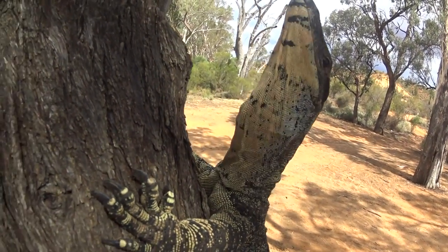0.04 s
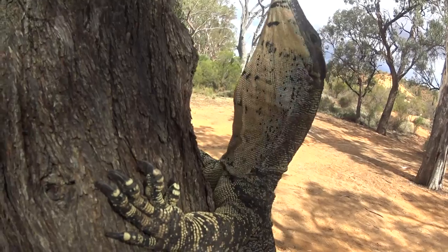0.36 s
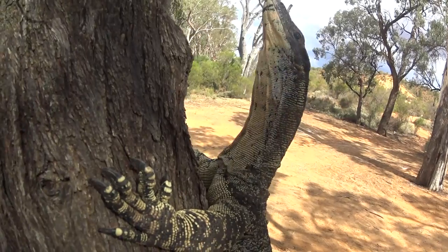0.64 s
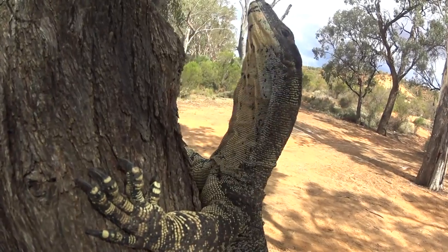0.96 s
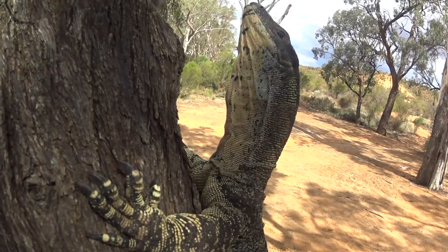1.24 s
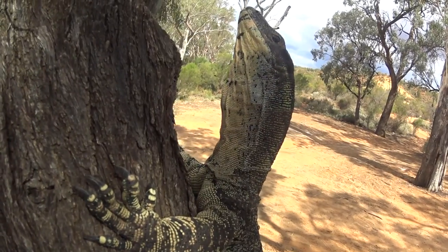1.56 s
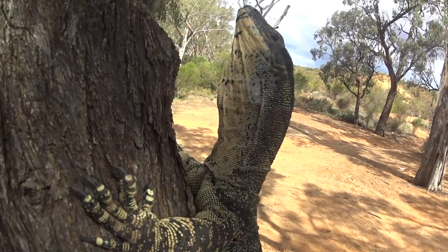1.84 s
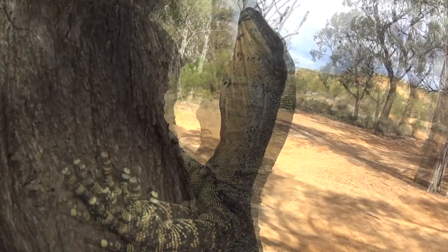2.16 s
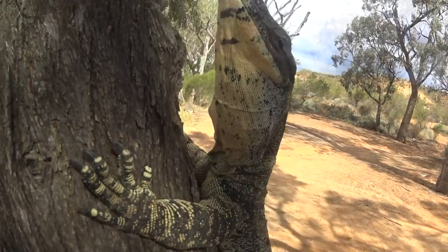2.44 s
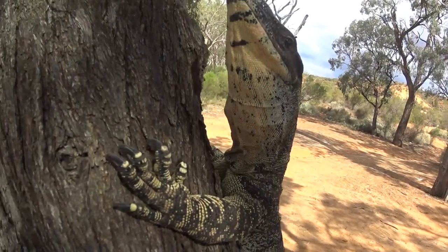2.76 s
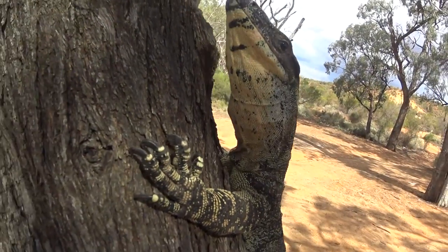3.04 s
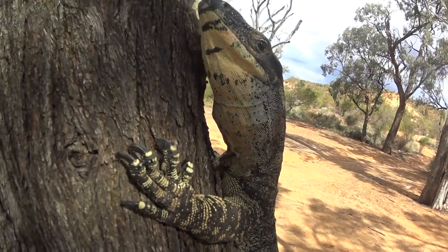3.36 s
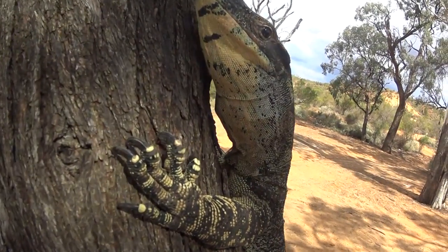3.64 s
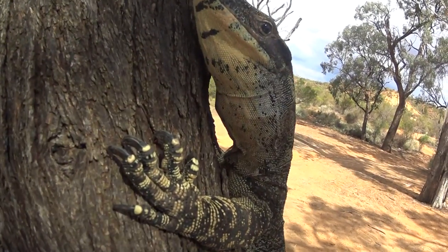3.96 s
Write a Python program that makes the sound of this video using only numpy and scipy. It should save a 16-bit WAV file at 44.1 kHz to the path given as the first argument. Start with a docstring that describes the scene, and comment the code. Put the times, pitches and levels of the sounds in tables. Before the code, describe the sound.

A large lizard hisses close to the microphone in quiet bushland. In the first second its claws tick on bark, it snorts briefly at about 0.5 seconds, then smacks wetly. Small birds chirp faintly around 1 and 1.8 seconds. After a wet click near 2.2 seconds, the hiss starts and swells until 4 seconds, with a hollow, fluttering throat tone. A soft low thump falls at about 3.4 seconds.

```python
"""A large monitor lizard clings to a tree in quiet bushland, close to the microphone.
Its claws tick on the bark, it puffs once through the nose, and it smacks and clicks wetly,
while small birds chirp among the trees. From just after 2 s it forces out a long, swelling hiss:
air rushes through the throat and jets from the nostrils, pulsed by a hollow, fluttering throat tone.
A soft low thump falls during the hiss."""
import sys
import numpy as np
from scipy import signal
from scipy.fft import rfft, irfft
from scipy.io import wavfile
from scipy.ndimage import uniform_filter1d, map_coordinates

SR = 44100
rng = np.random.default_rng(int(sys.argv[2]) if len(sys.argv) > 2 else 0)


def unload_wav(signal):
    """Save mono or channel-first audio to the path in sys.argv[1] as 16-bit WAV at rate SR, clipped to [-1, 1]."""
    wavfile.write(
        sys.argv[1],
        SR,
        np.round(np.clip(np.atleast_2d(signal).T, -1, 1) * 32767).astype(np.int16),
    )


N = 176400
T = np.arange(N) / SR
HZ = np.maximum(np.arange(N // 2 + 1) * SR / N, 1)
CUTOFF_HZ = 10980


def from_db(db):
    """Decibels to gain."""
    return 10 ** (np.asarray(db) / 20)


def unit_rms(x):
    """Scale to unit rms."""
    return x / np.sqrt(np.mean(np.abs(x) ** 2) + 1e-20)


def over_time(rows, column=1):
    """One table column at every sample."""
    rows = np.array(rows)
    return np.interp(T, rows[:, 0], rows[:, column])


def over_hz(rows):
    """A spectrum table at every frequency."""
    hz, value = np.transpose(rows)
    return np.interp(np.log(HZ), np.log(hz), value)


def pan(left_minus_right_db):
    """Left and right gains."""
    return from_db(np.array([[.5], [-.5]]) * left_minus_right_db)


def drift(rate_hz):
    """Low-passed random motion, unit rms."""
    return unit_rms(irfft(rfft(rng.standard_normal(N)) / (1 + (HZ / rate_hz) ** 2), N))


def noise(gain, correlation, balance_db=0):
    """Coloured stereo noise, unit rms."""
    mid, side = rfft(rng.standard_normal((2, N)))
    alike = np.clip(over_hz(correlation), -1, 1)
    stereo = np.sqrt(1 + alike) * mid + np.sqrt(1 - alike) * side * [[1], [-1]]
    return unit_rms(irfft(stereo * gain * pan(balance_db), N))


def peak(hz, width_hz):
    """Gain of one resonance at every frequency."""
    return 1 / np.hypot(1, (HZ ** 2 - hz ** 2) / (HZ * width_hz))


def resonate(x, hz, width_hz):
    """Two-pole resonator, unit peak gain."""
    r = np.exp(-np.pi * width_hz / SR)
    feedback = [1, -2 * r * np.cos(2 * np.pi * hz / SR), r * r]
    return signal.lfilter(np.array([1, 0, -1]) * (1 - r * r) / 2, feedback, x + 1e-18)


def strike(start_s, decay_s):
    """Envelope: quick rise, exponential fall."""
    age = np.maximum(T - start_s, 0) / decay_s
    return 1.38 * np.minimum(age * 2, 1) * np.exp(-age)


def swell(peak_s, rise_s, fall_s):
    """Envelope: Gaussian rise, exponential fall."""
    return np.exp(-(np.minimum(T - peak_s, 0) / rise_s) ** 2 - np.maximum(T - peak_s, 0) / fall_s)


def bursts(rows, width_octaves):
    """Short bursts of band-passed noise."""
    out, edge_ratio = 0, 2 ** (width_octaves / 2)
    for start_s, level_db, decay_s, centre_hz in rows:
        edges_hz = [centre_hz / edge_ratio, min(centre_hz * edge_ratio, CUTOFF_HZ)]
        bandpass = signal.butter(2, edges_hz, "band", fs=SR, output="sos")
        band = unit_rms(signal.sosfilt(bandpass, rng.standard_normal(N)))
        out = out + from_db(level_db) * strike(start_s, decay_s) * band
    return out


def flutter(width_hz):
    """Wandering complex amplitude of a resonance blown by turbulent air."""
    return unit_rms(drift(width_hz) + 1j * drift(width_hz))


def oscillate(amplitude, pitch_hz):
    """Tone with moving pitch and complex amplitude."""
    return np.sqrt(2) * np.real(amplitude * np.exp(2j * np.pi * np.cumsum(pitch_hz) / SR))


# open air: freq_hz, gain_db
AIR_SPECTRUM = [(60, -42), (110, -8.5), (400, -5), (3400, -14), (11000, -20.5)]
# open air: time_s, level_db
AIR_LEVEL = [(0, -55), (.85, -56), (2.1, -58)]
# background, left to right: freq_hz, correlation
AIR_CORRELATION = [(60, 0.7), (300, 0), (1200, -0.45), (8000, 0.4)]
# microphone rumble: freq_hz, gain_db
RUMBLE_SPECTRUM = [(18, -11), (35, -4.5), (55, -2.5), (78, -12), (105, -5.5), (160, -26), (300, -53)]
# microphone rumble: time_s, level_db
RUMBLE_LEVEL = [(0, -60.5), (1.9, -65), (3.3, -48), (4, -53)]
def outdoors():
    """Faint open air, and low rumble on the hand-held microphone."""
    air = noise(from_db(over_hz(AIR_SPECTRUM)), AIR_CORRELATION)
    rumble = noise(from_db(over_hz(RUMBLE_SPECTRUM)), AIR_CORRELATION, balance_db=-4.5)
    return air * from_db(over_time(AIR_LEVEL)) + rumble * from_db(over_time(RUMBLE_LEVEL))


# far calls: peak_s, level_db, rise_s, fall_s, centre_hz, width_hz
FAR_CALLS = [(0.98, -53, 0.077, 0.15, 5330, 1400), (1.088, -50, 0.046, 0.068, 4600, 3400),
             (1.082, -50, .01, .075, 4680, 350)]
def far_birds():
    """Harsh notes, blurred by the trees into bands of noise."""
    return sum(from_db(level_db) * swell(peak_s, rise_s, fall_s)
               * noise(peak(centre_hz, width_hz) ** 2, AIR_CORRELATION)
               for peak_s, level_db, rise_s, fall_s, centre_hz, width_hz in FAR_CALLS)


def bird_note(start_s, length_s, level_db, contour, jitter=.01225):
    """One whistle; contour maps progress (0-1) to pitch in Hz."""
    progress = np.clip((T - start_s) / length_s, 0, 1)
    pitch_hz = contour(progress) * (1 + jitter * drift(460))
    envelope = np.sqrt(2 * np.abs(np.sin(np.pi * progress)))
    return from_db(level_db) * envelope * np.sin(2 * np.pi * np.cumsum(pitch_hz) / SR)


def hook(progress, held_hz=4300, drop_hz=1750, held_at=.66):
    """Pitch drops fast, holds, then dips at the end."""
    return held_hz + drop_hz * (1 - progress / held_at) ** 3


def slurs(progress, count=3, low_hz=2480, drop_hz=450):
    """Pitch jumps up and slides back, repeatedly."""
    return low_hz + drop_hz * (1 - progress * count % 1) ** 2


# gliding notes: start_s, length_s, level_db, start_hz, middle_hz, end_hz
CHIRPS = [(.298, .02, -59, 5700, 4850, 3700), (1.069, 0.025, -45.5, 6650, 6300, 5150),
          (1.065, 0.03, -48.5, 5400, 4660, 3200), (1.302, 0.03, -61, 6400, 6300, 6280),
          (1.752, 0.029, -56, 6380, 5780, 3800), (1.774, 0.0162, -49.5, 8400, 7230, 6800),
          (1.838, .013, -54.5, 6800, 5960, 5240), (2.185, 0.071, -53, 3750, 4340, 4450)]
# hooked notes: start_s, length_s, level_db
HOOKS = [(.094, 0.043, -56), (1.021, 0.041, -46.5), (1.804, 0.031, -48)]
def birds(rasp=.17, echo_db=-1.5, t60_s=.47):
    """Whistled glides, hooks and one faint warble, scattered by the trees."""
    song = 0
    for start_s, length_s, level_db, *pitches_hz in CHIRPS:
        glide = np.poly1d(np.polyfit([0, .5, 1], pitches_hz, 2))
        song = song + bird_note(start_s, length_s, level_db, glide)
    song += sum(bird_note(*row, hook) for row in HOOKS)
    song += bird_note(start_s=1.83, length_s=.115, level_db=-65, contour=slurs)
    song *= 1 + rasp * drift(530)
    trees = rng.standard_normal((2, N)) * from_db(-60 * T / t60_s)
    echo = signal.fftconvolve(song[None], unit_rms(trees) / np.sqrt(N), axes=1)[:, :N]
    return song + from_db(echo_db) * echo


def bark_rustle(crumbs_per_s=250, level_db=-60, end_s=1):
    """Bark rustles as the lizard shifts its grip."""
    crumbs = (rng.random(N) < crumbs_per_s / SR) * rng.standard_normal(N)
    grip = np.sin(np.pi * np.minimum(T / end_s, 1) ** .4)
    return from_db(level_db) * grip * unit_rms(resonate(crumbs, hz=5000, width_hz=20000))


# high noise bursts: start_s, level_db, decay_s, centre_hz
TICKS_AND_CHIRP = [(.127, -45, 0.0021, 7500), (.1665, -34, 0.0017, 3830), (.174, -49, 0.018, 3200),
                   (.2565, -46.5, 0.00093, 8000), (.295, -57, 0.066, 6040), (.363, -50, 0.0021, 3400),
                   (.471, -49, 0.0024, 2770), (.7435, -41, 0.0036, 6760), (.784, -45, 0.00081, 7300),
                   (.797, -38.5, 0.00052, 6670), (1.215, -43.5, 0.00089, 9500),
                   (2.308, -44.5, 0.0041, 7700)]
def ticks_and_chirp():
    """Short ticks of claws on bark; the long burst at 0.295 s is a distant bird's faint, blurred chirp."""
    return bursts(TICKS_AND_CHIRP, width_octaves=1.05)


# mouth smacks: start_s, level_db, decay_s, centre_hz
SMACKS = [(.7425, -40.5, 0.0046, 1670), (.784, -37.5, 0.00061, 1160), (.7972, -46.5, 0.0031, 790),
          (2.2565, -37, 0.0055, 704), (2.2575, -43, 0.0036, 1330), (2.308, -42.5, 0.0052, 2600)]
# falling low tones: start_s, level_db, start_hz, end_hz, decay_s
CLICKS_AND_THUMP = [(.783, -47.5, 640, 262, 0.009), (2.014, -46, 516, 115, 0.014),
                    (2.2563, -32.5, 500, 85, 0.013), (3.389, -42, 198, 112, 0.022)]
def smacks_clicks_and_thump(glide_s=.0123, roughness=.6, pan_db=-1.5):
    """Wet smacks, three rough falling clicks, and a soft low thump at 3.389 s during the hiss."""
    out = bursts(SMACKS, width_octaves=.74)
    for start_s, level_db, start_hz, end_hz, decay_s in CLICKS_AND_THUMP:
        pitch_hz = end_hz + (start_hz - end_hz) * np.exp(-np.maximum(T - start_s, 0) / glide_s)
        tone = np.sin(2 * np.pi * np.cumsum(pitch_hz * (T > start_s)) / SR)
        out += from_db(level_db) * strike(start_s, decay_s) * (1 + roughness * drift(450)) * tone
    return out * pan(pan_db)


# breath, left to right: freq_hz, correlation
BREATH_CORRELATION = [(300, 0.9), (700, 0.85), (2500, 0.71), (7000, 0.94)]
# breath balance: freq_hz, left_minus_right_db
BREATH_BALANCE = [(340, -2), (1900, -2), (3400, 0), (11000, 1)]
def breath(gain):
    """Turbulent air from the lizard's head."""
    return noise(gain, BREATH_CORRELATION, over_hz(BREATH_BALANCE))


# nose puff: freq_hz, gain_db
PUFF_SPECTRUM = [(120, -19), (260, -11), (390, 1), (500, -4.5), (850, -14), (1150, -21), (3600, -24),
                 (5600, -17), (6200, -7), (6800, -22), (8600, -21), (9400, -15), (11000, -33)]
# puff and draw of air: time_s, level_db
PUFF_LEVEL = [(.495, -79), (.52, -54), (.541, -40), (.558, -38.5), (.574, -41.5), (.59, -83), (1.03, -60.5),
              (1.35, -87)]
def puff(roughness_db=1.8):
    """A short, rough snort, then a faint draw of air."""
    air = breath(from_db(over_hz(PUFF_SPECTRUM)))
    return air * from_db(over_time(PUFF_LEVEL) + roughness_db * drift(200))


# nostril whistles: peak_s, level_db, rise_s, fall_s, centre_hz, width_hz
EDGE_TONES = [(2.82, -43.5, .1, .5, 7790, 100), (3.19, -37.5, 0.33, 0.12, 6700, 270),
              (3.8, -38, .14, .6, 7250, 189)]
def edge_tones():
    """Breathy whistles catch at the nostrils, one after another."""
    return sum(from_db(level_db) * swell(peak_s, rise_s, fall_s) * breath(peak(centre_hz, width_hz))
               for peak_s, level_db, rise_s, fall_s, centre_hz, width_hz in EDGE_TONES)


# throat tone: time_s, relative_db, pitch_hz
THROAT_TONE = [(2.23, -45, 361), (2.43, -48, 350), (2.5, -38, 314.6), (2.7, -34, 327.3),
               (2.86, -33.5, 314.9), (2.99, -28.5, 320), (3.035, -37.5, 324.4), (3.1, -29, 310),
               (3.22, -26, 314.4), (3.34, -24, 323.4), (3.375, -35.5, 330.3), (3.425, -20.5, 350.8),
               (3.485, -27, 325.7), (3.53, -23, 330.2), (3.68, -24.5, 321), (3.718, -34.5, 342),
               (3.75, -24, 334.2), (3.82, -23.5, 352.8), (3.855, -30.5, 360.5), (3.895, -19.5, 341.5),
               (4, -21.5, 358)]
# throat ringing: time_s, steady_share
THROAT_STEADINESS = [(2.6, 0), (3.3, 0.53), (3.82, 0.46), (3.92, 0.9)]
def throat_tone(flutter_hz=29, skirt_hz=74, skirt_db=.5, gain_db=-.5, pan_db=-3.5):
    """The throat flutters, steadying under pressure. Returns the tone and its unit-rms cycle."""
    steady = over_time(THROAT_STEADINESS)
    unsteady = flutter(flutter_hz) + (1 - steady) * from_db(skirt_db) * flutter(skirt_hz)
    amplitude = np.sqrt(steady) + np.sqrt(1 - steady) * unsteady
    amplitude /= np.sqrt(uniform_filter1d(np.abs(amplitude) ** 2, size=1700))  # level over 39 ms
    cycle = oscillate(amplitude, over_time(THROAT_TONE, column=2))
    return cycle * from_db(over_time(THROAT_TONE) + gain_db) * pan(pan_db), cycle


EARLY_S, MIDDLE_S, LATE_S = 2.8, 3.24, 3.55  # the airway changes shape as effort grows
# throat rush: freq_hz, gain_db
RUSH_SPECTRUM = [(170, -38), (260, 3.5), (450, 1), (750, -2.5), (1100, -9), (1290, -15), (1365, -20.5),
                 (1500, -8), (1950, -12.5), (2600, -19), (4000, -17), (11000, -22)]
# throat rush: time_s, level_db
RUSH_LEVEL = [(2.25, -52), (2.58, -41.5), (3.0, -35), (3.35, -32.5), (3.55, -29.5), (3.72, -30.5),
              (3.9, -28), (4, -27.5)]
def throat_rush(cycle, pulse_depth=.15):
    """Pulsed air in the throat, with a narrow whistle that sinks and grows."""
    whistle_hz = np.interp(T, [EARLY_S, LATE_S], [1490, 1433])
    whistle_relative_db = np.interp(T, [MIDDLE_S, LATE_S], [-19.5, -13])
    whistle = oscillate(flutter(width_hz=23.5), whistle_hz) * from_db(whistle_relative_db)
    air = breath(from_db(over_hz(RUSH_SPECTRUM))) * (1 + pulse_depth * cycle)
    return (air + whistle) * from_db(over_time(RUSH_LEVEL))


# nose resonances: centre_hz, width_hz, early_weight_db, middle_weight_db, late_weight_db
NOSE_RESONANCES = [(2900, 490, -9, -30, -29), (3850, 870, -15.5, -12.5, -22.5), (5010, 560, -5, -6, -1.5),
                   (6760, 580, -5.5, -5, -6.5), (9134, 310, -1, 2.5, 3)]
# nostril jet: time_s, level_db
JET_LEVEL = [(2.25, -59.5), (2.56, -43), (2.85, -38), (3.3, -30), (3.72, -29.5), (3.93, -27.5)]
def nostril_jet(cycle, pulse_depth=.18, flicker_db=.75, wander=.005, sag_per_s=.01):
    """Pulsed jet noise in nose resonances that wander, sag and trade strength as the passage widens."""
    jet, power = 0, 0
    for centre_hz, width_hz, *weights_db in NOSE_RESONANCES:
        gain = from_db(np.interp(T, [EARLY_S, MIDDLE_S, LATE_S], weights_db)) * np.sqrt(width_hz)
        pitch_ratio = 1 + wander * drift(6) - sag_per_s * (T - MIDDLE_S)
        read_position = np.cumsum(pitch_ratio)
        band = breath(peak(centre_hz, width_hz))
        bent_band = np.array([map_coordinates(side, [read_position], mode="wrap") for side in band])
        jet = jet + gain * bent_band
        power = power + gain ** 2
    envelope = from_db(over_time(JET_LEVEL) + flicker_db * drift(25))
    return jet / np.sqrt(power) * envelope * (1 + pulse_depth * cycle)


def hiss(start_s=2.113, attack_s=.24, low_cut_hz=220):
    """The throat tone pulses the air that rushes on through the nose."""
    tone, cycle = throat_tone()
    onset = np.clip((T - start_s) / attack_s, 0, 1) ** 2
    exhale = onset * (tone + throat_rush(cycle) + nostril_jet(cycle))
    return signal.sosfilt(signal.butter(6, low_cut_hz, "high", fs=SR, output="sos"), exhale)


def scene():
    """The lizard on its tree, with the bush around it."""
    breathing = hiss() + edge_tones() + puff()
    small_sounds = smacks_clicks_and_thump() + bark_rustle() + ticks_and_chirp()
    return breathing + small_sounds + birds() + far_birds() + outdoors()


def record(dry):
    """Steep low-pass."""
    return signal.sosfilt(signal.ellip(16, .2, 80, CUTOFF_HZ, fs=SR, output="sos"), dry)


dry = scene()
out = record(dry)
unload_wav(out)
```